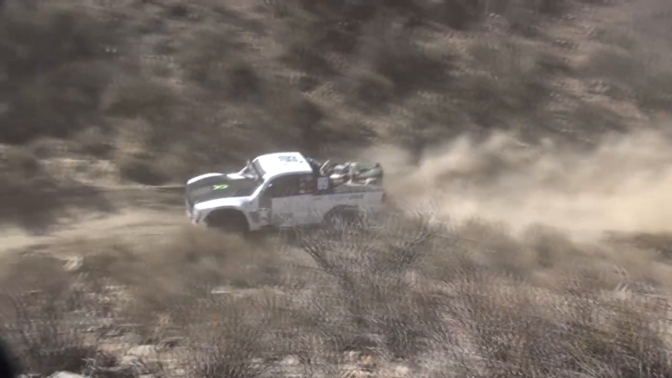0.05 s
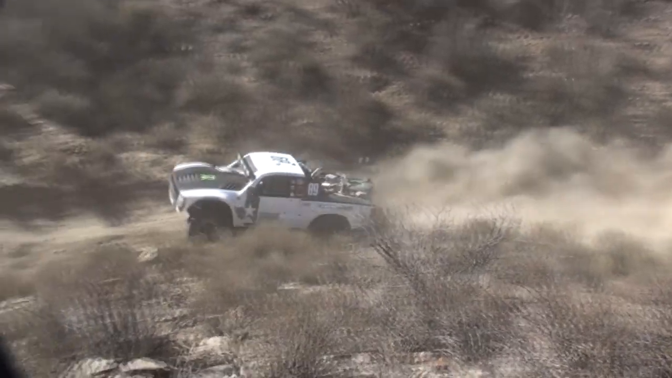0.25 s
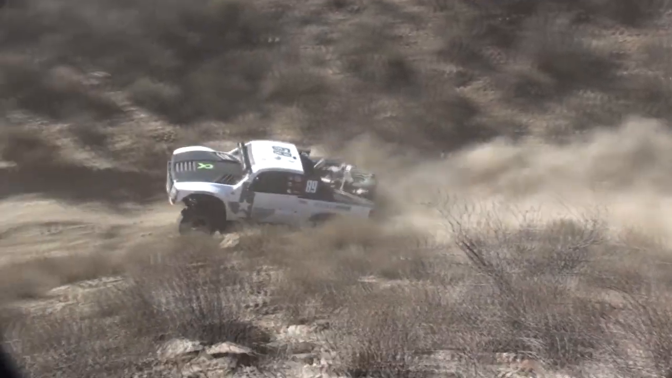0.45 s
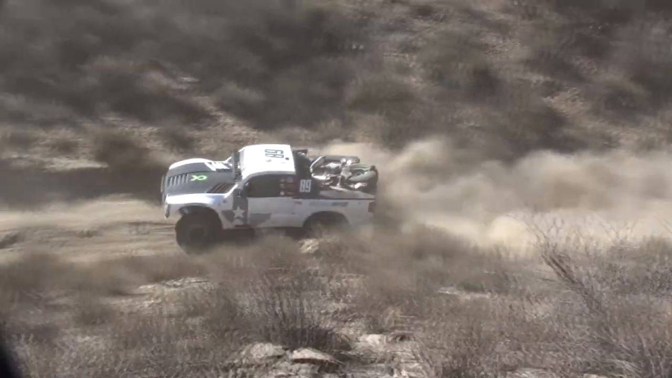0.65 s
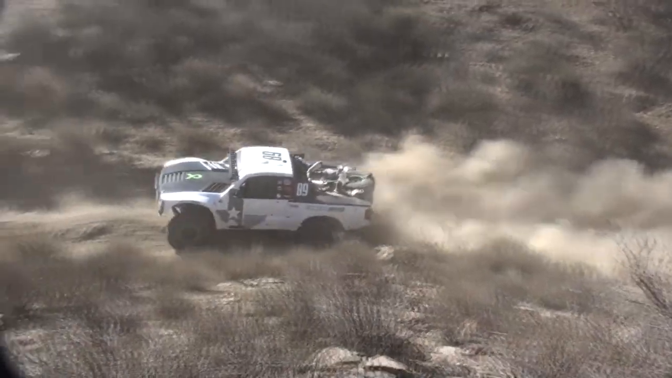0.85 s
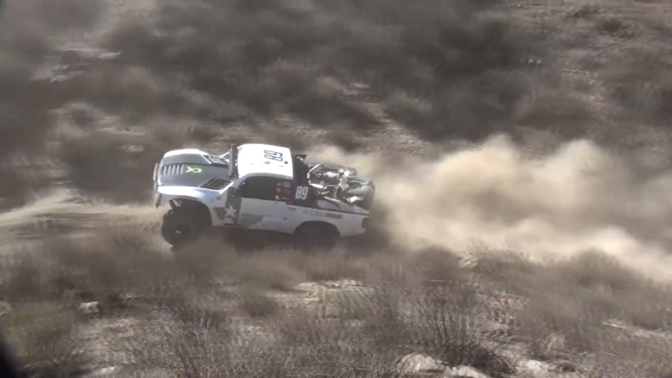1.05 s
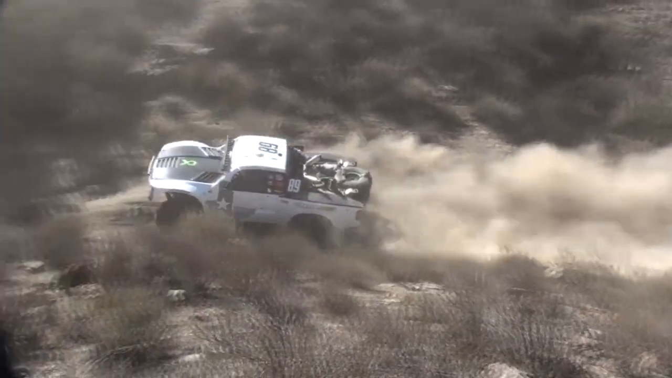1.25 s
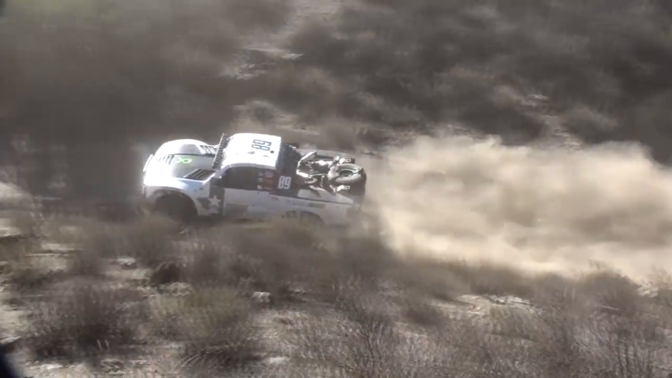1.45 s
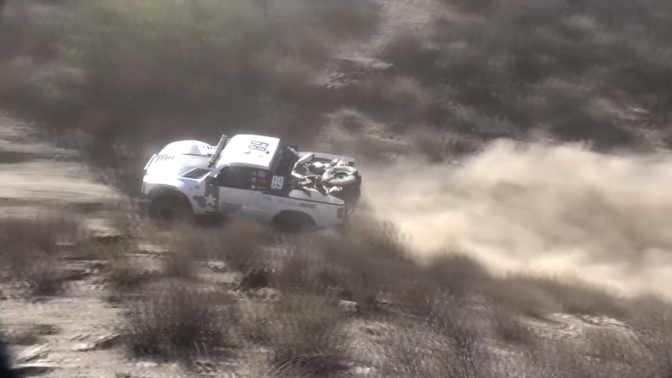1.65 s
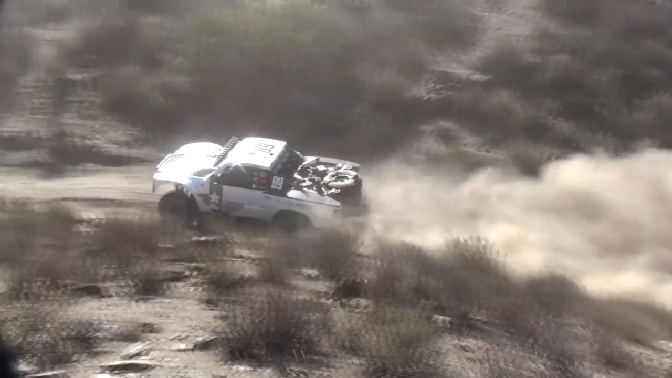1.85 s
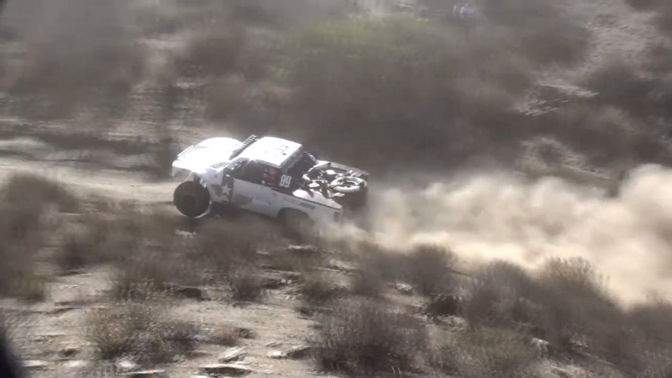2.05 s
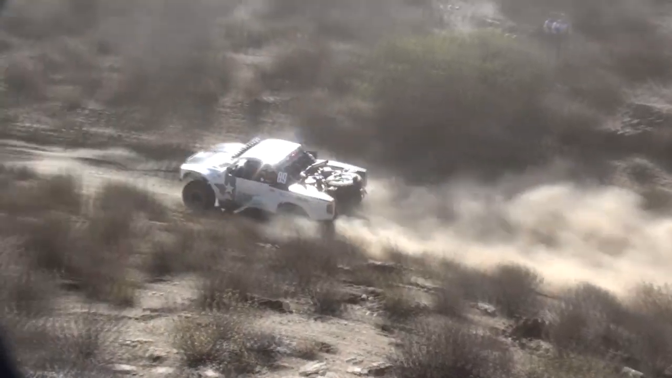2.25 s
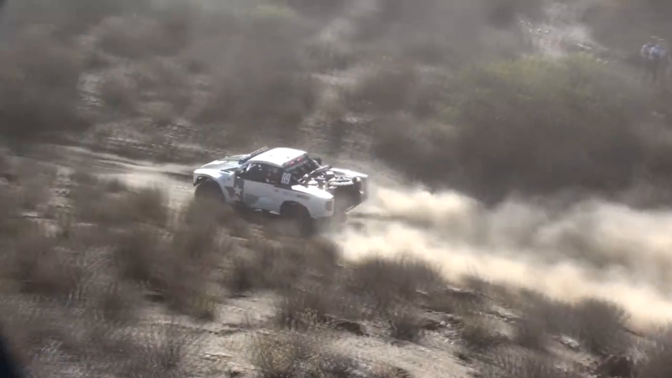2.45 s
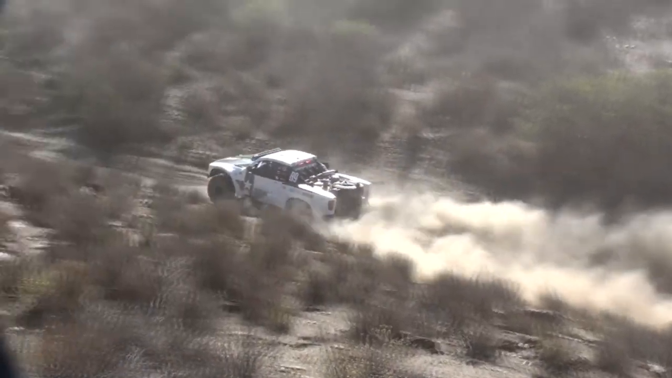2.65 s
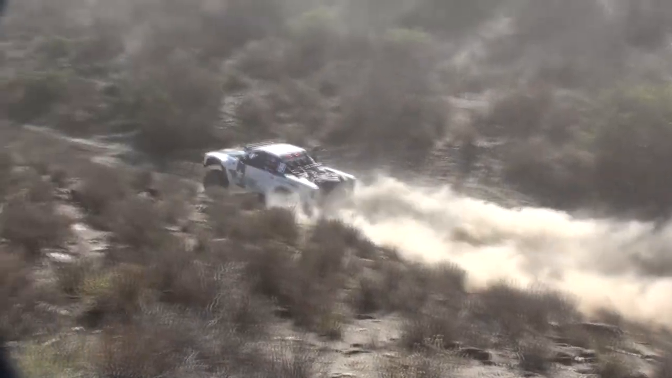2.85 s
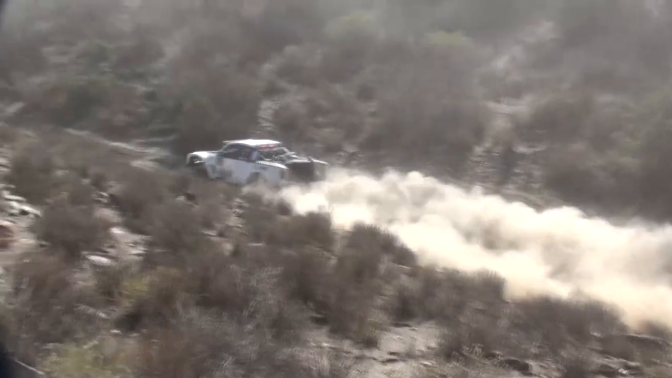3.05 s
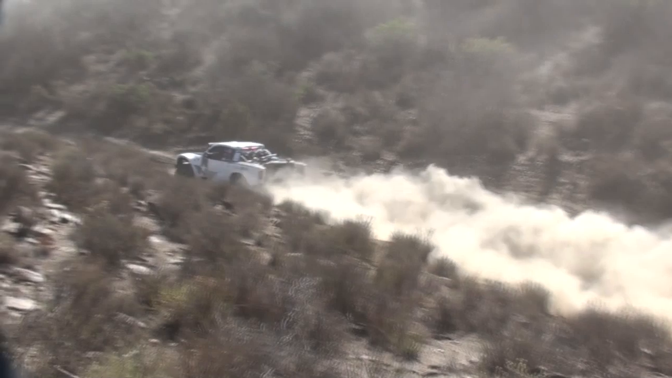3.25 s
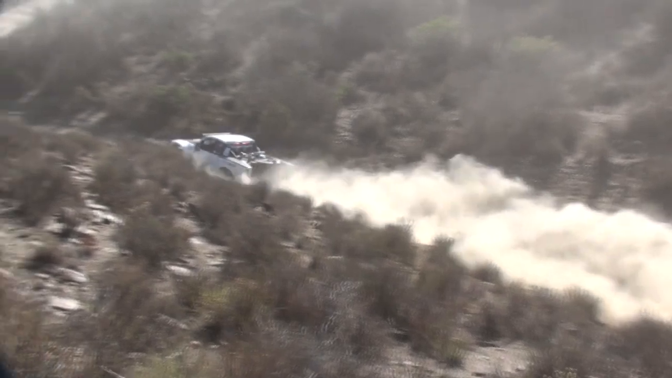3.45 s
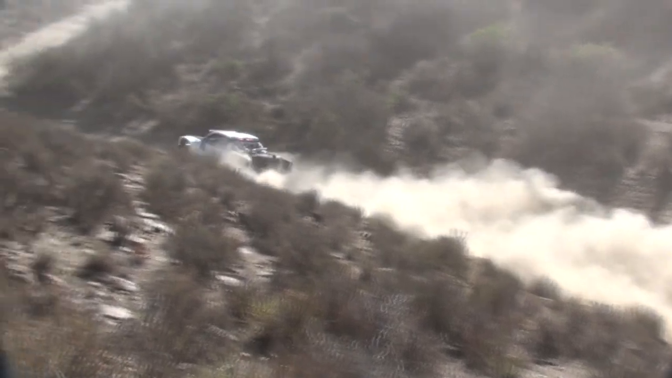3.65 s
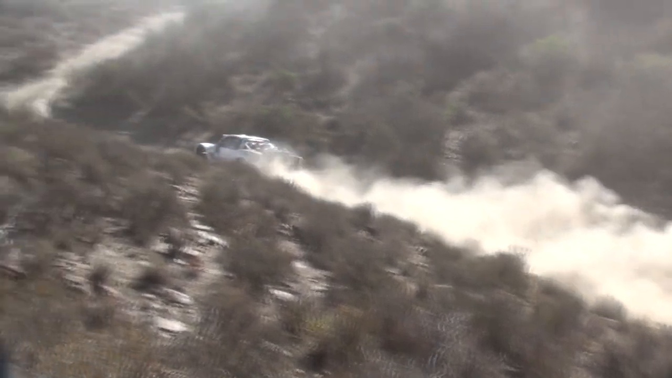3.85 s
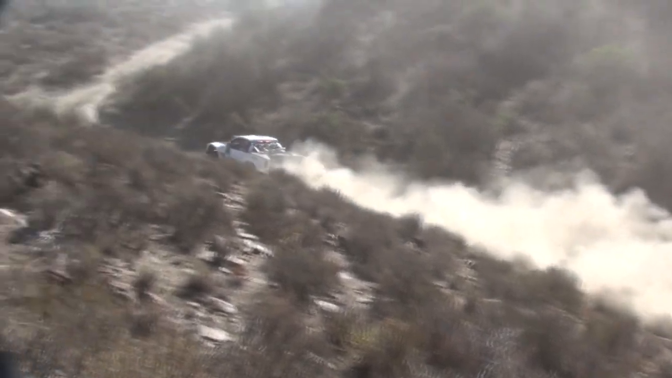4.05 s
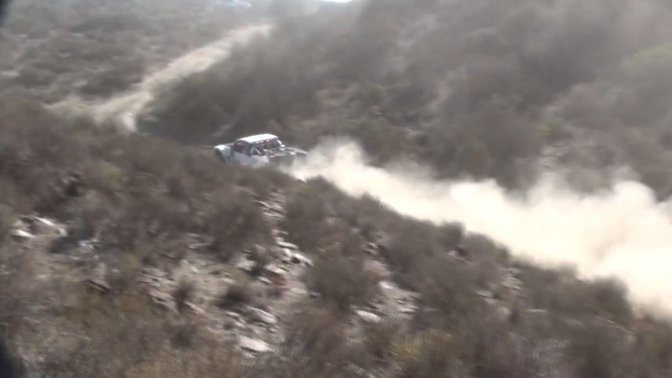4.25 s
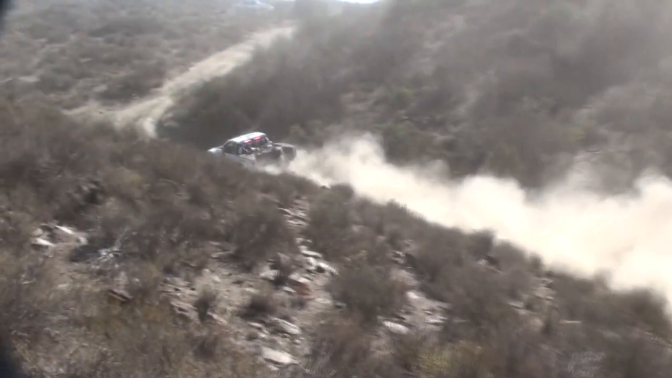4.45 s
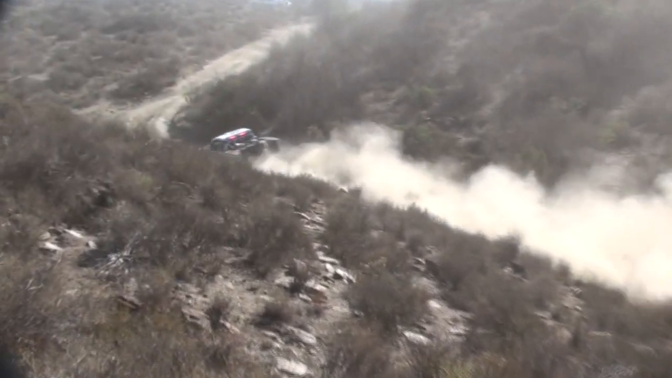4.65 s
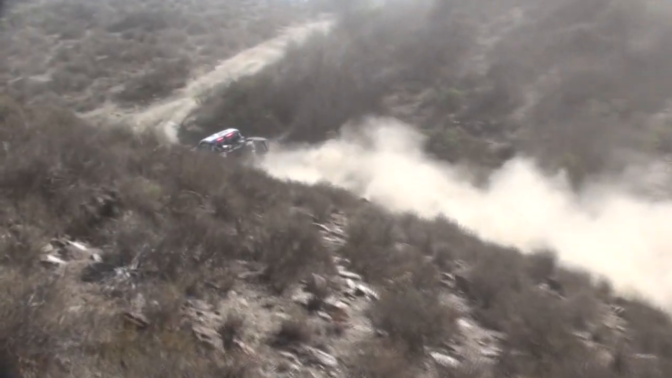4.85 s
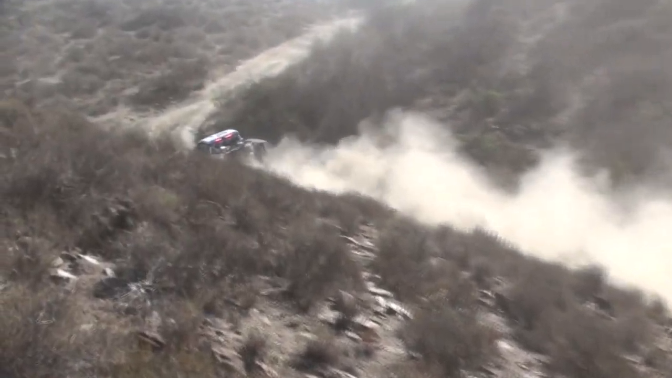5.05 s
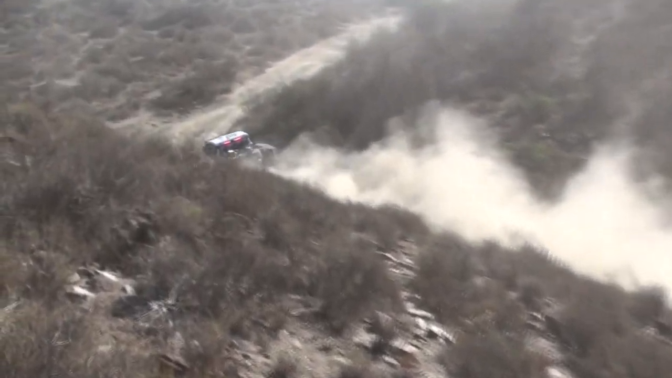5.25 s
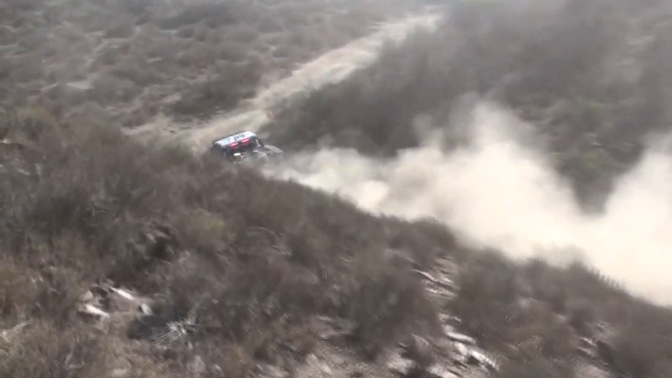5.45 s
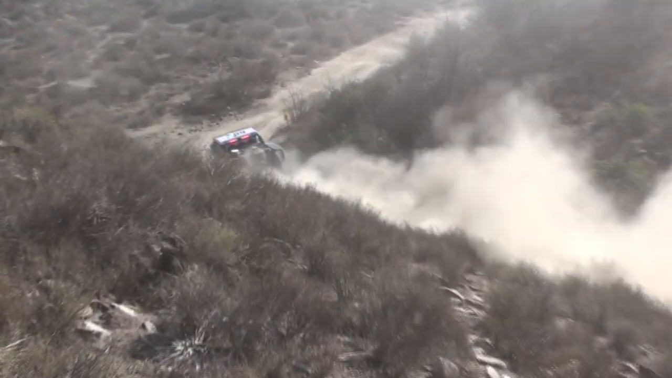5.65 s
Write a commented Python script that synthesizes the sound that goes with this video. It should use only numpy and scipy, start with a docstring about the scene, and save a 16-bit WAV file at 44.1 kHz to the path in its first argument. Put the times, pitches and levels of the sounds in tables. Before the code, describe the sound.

Raw eight-cylinder exhaust climbs to a hard bellow with sharp pops, then drops to a distant low burble with thin squeals and rattles.

```python
"""A desert racing truck with an open eight-cylinder exhaust climbs a dusty hillside, turns away
and lifts off behind the ridge. Sines at multiples of crank speed make its drone; firing pulses and gas
noise, filtered by body and pipes, make its roar and pops. Damped noise bursts are the chassis rattles,
narrow noise and thin tones the brakes, and low gusting noise the wind at two microphone ports."""
import sys
import numpy as np
from scipy import signal
from scipy.fft import rfft, irfft, next_fast_len
from scipy.io import wavfile
from scipy.ndimage import uniform_filter1d, map_coordinates

SR = 44100
rng = np.random.default_rng(int(sys.argv[2]) if len(sys.argv) > 2 else 0)


def transcribe(signal):
    """Save signal, clipped to [-1, 1], as a 16-bit WAV file at the path in sys.argv[1]."""
    frames = np.atleast_2d(signal).T
    limited = np.clip(frames, -1, 1)
    pcm = np.round(limited * 32767).astype(np.int16)
    wavfile.write(sys.argv[1], SR, pcm)


N = 251811

# crank speed and its strong orders: (time [s], speed [turns/s], 3rd, 4th (firing), 5th, 7th order level [dB])
ENGINE = [(0.0, 42.4, -29, -37, -20, -35), (0.11, 41.3, -26.5, -14, -27, -36),
          (0.27, 43.9, -15, -26.5, -35, -41), (0.35, 37.4, -31, -21, -32, -39),
          (0.43, 37.7, -27, -18.5, -33, -46), (0.51, 39.5, -29.5, -26.5, -22, -44),
          (0.7, 41, -23, -17, -28, -33), (0.79, 43.6, -16.5, -25, -29, -35),
          (0.9, 46.8, -16.5, -14.5, -28, -24), (1.06, 51.7, -30.5, -12, -24.5, -32),
          (1.45, 54.9, -39, -11, -33, -28.5), (1.57, 55.4, -40, -11, -25, -30),
          (1.7, 58.7, -34, -10.5, -37, -40), (1.76, 60, -48, -11, -46, -46),
          (2.04, 61.8, -47, -11.5, -30, -36), (2.11, 58.5, -26, -12, -38, -30.5),
          (2.3, 61.7, -29.5, -12, -36, -39), (2.43, 53.7, -19.5, -15, -45, -27.5),
          (2.67, 58.2, -18.5, -20.5, -41, -28.5), (2.7, 57.7, -18, -23, -54, -31),
          (2.83, 60.6, -25.5, -16, -37, -31), (3.04, 61.2, -23, -19, -39, -33),
          (3.1, 60.3, -23, -20, -34.5, -38), (3.15, 57.9, -25, -23, -60, -56),
          (3.2, 56.5, -24, -34, -43, -51), (3.26, 56.5, -26, -26.5, -59, -39),
          (3.45, 55.3, -23, -20.5, -46, -28.5), (3.66, 56.7, -20.5, -35, -46, -31.5),
          (3.77, 58.3, -22, -32, -45, -30), (3.82, 57.5, -23.5, -40, -53, -31),
          (3.9, 53.7, -29, -27, -49, -43), (3.97, 50.8, -30.5, -43, -42, -57),
          (4.09, 42.9, -22.5, -38, -48, -42), (4.18, 39.8, -26.5, -44, -47, -54),
          (4.29, 41.3, -24.5, -31, -50, -59), (4.39, 42.9, -23.5, -31.5, -49, -64),
          (4.64, 38.5, -29.5, -36, -41, -65), (4.72, 31.8, -55, -33, -53, -60),
          (4.8, 29.4, -44, -26, -35.5, -52), (4.98, 26.9, -55, -28.5, -31.5, -41),
          (5.22, 31.3, -41, -23.5, -31.5, -40.5), (5.45, 28.4, -47, -27, -33.5, -37),
          (5.61, 34.3, -38, -17, -31.5, -47), (5.71, 38.3, -28, -41, -35, -46)]
# spectrum of escaping gas: (frequency [Hz], relative density [dB per Hz])
CRACKLE = [(1180, -11), (2000, 0), (2220, -1), (2820, -2.5), (3140, -2.5), (3750, -6), (4020, -11.5),
           (4700, -9), (6000, -16), (7800, -18.5), (13200, -120)]
# ringing of the pipe ends: (frequency [Hz], width [Hz], relative level [dB])
TIP = [(3170, 560, 0), (3650, 400, -2.5)]
# tailpipe resonances, one list for each view of the truck: (frequency [Hz], width [Hz], relative level [dB])
PIPES = [
    [(635, 100, -2), (983, 92, 1.5), (1270, 39, -4), (1570, 58, -1.5), (1750, 77, -6)],
    [(570, 35.4, -30), (964, 92, 1), (1238, 56, 2.5), (1536, 37, 2), (1882, 86, -2.5)],
    [(740, 110, 0.5), (1010, 56.2, 3.5), (1413.4, 132, -6), (1750, 140, -8.5), (1994, 92, -5.5)],
    [(590, 58.3, -31), (883.2, 64, 4.5), (1227, 106, -2.5), (1401.5, 246, -21), (1697, 51, 1.5)],
    [(574, 84, -18), (893.2, 65.5, -2.5), (1064, 88.6, -1.5), (1394.6, 53, 0), (1770, 170, -7)],
    [(620, 93, -26), (913, 75, 6), (1052, 75, -7), (1290, 96, -3), (1780, 300, -24)],
]


def amp(db):
    """Amplitude ratio: twenty decibels for each factor of ten."""
    return 10 ** (np.asarray(db) / 20)


def unit(x):
    """Normalization to a root-mean-square of 1."""
    return x / np.sqrt(np.mean(x ** 2) + 1e-20)


def levelled(x):
    """Running normalization: rms held at 1 over fifths of a second."""
    return x / np.sqrt(np.abs(uniform_filter1d(x ** 2, SR // 5)) + 1e-20)


def along(points, hz):
    """Interpolation of (frequency [Hz], value) points on a logarithmic frequency axis."""
    f, v = np.transpose(points)
    return np.interp(np.log(hz + 1), np.log(f + 1), v)


def curves(rows):
    """Linear interpolation in time: one value per sample for each column after the time."""
    times, *columns = np.transpose(rows)
    return [np.interp(np.arange(N) / SR, times, column) for column in columns]


def wobble(rate):
    """Slow random modulation: a smooth curve through rate random knots a second."""
    knots = rng.standard_normal(int(N * rate / SR) + 4)
    return map_coordinates(knots, [np.arange(N) * rate / SR])


def filtered(x, response):
    """Linear filtering: the spectrum of x times a complex response; mirrored ends keep the edges quiet."""
    m, margin = next_fast_len(N + SR // 4), SR // 8
    wide = np.pad(x, [(0, 0)] * (x.ndim - 1) + [(margin, m - N - margin)], "reflect")
    return irfft(rfft(wide) * response(np.fft.rfftfreq(m, 1 / SR)), m)[..., margin:margin + N]


def coloured(x, spectrum):
    """Spectral shaping: x weighted by a (frequency [Hz], level [dB]) curve."""
    return filtered(x, lambda hz: amp(along(spectrum, hz)))


def resonant(x, modes):
    """Modal resonance: parallel second-order band-passes (frequency, width, level), alternating in sign."""
    def response(f):
        return sum((-1) ** k * amp(db) * 1j * f * width / (centre ** 2 - f * f + 1j * f * width)
                   for k, (centre, width, db) in enumerate(modes))
    return filtered(x, response)


def drone(turns, growl_db):
    """Periodicity of the crank: strong orders, two that follow the growl, and weak ones from uneven cylinders."""
    # multiples of crank speed, as in the engine table
    strong_orders = (3, 4, 5, 7)
    # orders that come and go with the growl: (multiple of crank speed, level over the growl [dB])
    uneven_orders = [(6, -15.5), (8, -12)]
    # weak orders, skipping those above: (multiple of crank speed, relative level [dB])
    weak_orders = [(0.5, -60), (1, -62), (1.5, -14), (2, -15.5), (2.5, -15.5), (3, -1), (3.5, -13.5),
                   (4, 0), (4.5, -20.5), (5, -12.5), (5.5, -19.5), (6, -14.5), (6.5, -13.5), (7, -12),
                   (7.5, -31), (8, -14.5), (8.5, -22), (9, -18), (9.5, -24.5), (10, -8.5), (10.5, -17.5),
                   (11, -35), (11.5, -17), (12, -14)]
    # level of the weak orders below the firing order: (time [s], level [dB])
    low_level = [(0, -30), (.9, -33), (1.4, -38.5), (1.8, -28.5), (2.25, -28), (2.45, -35), (2.8, -28.5),
                 (3.8, -31), (4.3, -37.5), (5, -44), (5.71, -40)]
    # body response with a dip in the growl: (frequency [Hz], relative level [dB])
    body = [(200, 14.5), (350, -.3), (450, -8.5), (580, 4.8), (760, -5.5)]
    speed, *strong_db = curves(ENGINE)
    # strong orders flutter when the crank is slow: fully below 42 turns/s, barely above 51
    slowness = np.clip((51 - speed) / (51 - 42), 0, 1)
    flutter_db = 0.21 + 2 * slowness
    taken = tuple(strong_orders) + tuple(k for k, _ in uneven_orders)
    firing_order = strong_orders[1]

    def tone(k):
        return np.sqrt(2) * np.sin(2 * np.pi * (k * turns + rng.random()))

    def weak(pick):
        return unit(sum(amp(db + 3.3 * wobble(13)) * tone(k)
                        for k, db in weak_orders if pick(k) and k not in taken))

    strong = sum(amp(db + flutter_db * wobble(18)) * tone(k) for k, db in zip(strong_orders, strong_db))
    uneven = sum(amp(growl_db + db + 4.8 * wobble(12)) * tone(k) for k, db in uneven_orders)
    low = amp(curves(low_level)[0] + 1.1 * wobble(5.9)) * weak(lambda k: k < firing_order)
    high = amp(growl_db - 6.5) * coloured(weak(lambda k: k > firing_order), body)
    return strong + uneven + low + high


def blasts(turns, scatter_db, t60, pulse_share, bank=0):
    """Pulsed gas discharge: four firings a turn, each a sharp pulse and a decaying puff of turbulence."""
    # strength of each cylinder in firing order: (level [dB])
    cylinder_db = [8.5, -9.5, 1.8, 1.5, -3.5, 5, -2, 3.5]
    # extra travel time through each cylinder's header pipe: (delay [ms])
    header_ms = [0, .55, .15, .9, .3, .7, .05, 1.1]
    fired = np.floor(4 * turns).astype(int)
    at = np.flatnonzero(np.diff(fired, prepend=0))
    cylinder = fired[at] % 8
    chance = rng.standard_normal((len(at), 2))
    size = amp(np.roll(cylinder_db, bank)[cylinder] + scatter_db * chance[:, 0])
    # every header shares 0.5 ms of travel; each firing strays a little in time
    late = (np.array(header_ms)[cylinder] + .5 + .05 * chance[:, 1]) * SR / 1000
    pulses = np.bincount(at + np.abs(late).astype(int), size, N + SR)[:N]
    puffs = signal.lfilter([1], [1, -amp(-60 / (t60 * SR))], pulses)
    turbulence = (puffs + 2.6 * puffs.mean()) * rng.standard_normal(N)
    share = np.clip(pulse_share, 0, 1)
    return share * unit(pulses) + (1 - share) * unit(turbulence)


def tailpipes(turns):
    """Pipe resonance: two banks share one cylinder pattern, shifted by four firings, and ring alternate modes."""
    # as the truck turns, views crossfade between full spans: (start [s], end [s])
    views = [(0, 0.71), (1.65, 2.5), (2.45, 3.17), (3.35, 3.77), (4.1, 5.7), (5.5, 5.5)]
    left, right = (blasts(turns, scatter_db=1.5, t60=.05, pulse_share=.72, bank=b) for b in (0, 4))
    rasp = np.zeros(N)
    for k, modes in enumerate(PIPES):
        heard = np.repeat(np.arange(len(views)) == k, 2)
        facing = np.interp(np.arange(N) / SR, np.ravel(views), heard)
        rasp += facing * unit(resonant(left, modes[::2]) + resonant(right, modes[1::2]))
    # band limits near 500 and 2100 Hz
    return filtered(rasp, lambda hz: 1 / (1 + (hz / 2100) ** 8) / (1 + (500 / (hz + 1)) ** 8))


def truck():
    """Source and filter: the drone, and firing blasts shaped into growl, rasp, crackle and hiss."""
    # exhaust bark and hiss of widely scattered firings: (time [s], growl [dB], rasp [dB], crackle [dB], hiss
    # [dB])
    roar = [(0.0, -17.5, -22, -32.5, -32), (0.09, -25, -25, -34.5, -40.5), (0.22, -19.5, -24, -33.5, -37.5),
            (0.37, -27.5, -28.5, -32.5, -40), (0.67, -17.5, -24, -32, -33), (1.08, -22, -25, -33, -38.5),
            (1.59, -26, -25, -30.5, -41), (1.78, -28.5, -23.5, -29.5, -37.5),
            (2.07, -25, -19.5, -27.5, -39), (2.3, -23, -23, -31, -41), (2.38, -27.5, -28, -35, -43.5),
            (2.58, -24, -22.5, -31, -40.5), (2.69, -30, -25, -31.5, -41), (2.8, -21.5, -23, -32, -41),
            (2.94, -26.5, -22.5, -31.5, -40.5), (3.04, -23, -20.5, -33, -41), (3.16, -30.5, -29, -39, -44),
            (3.61, -28, -24, -35.5, -44), (3.72, -28, -20.5, -36, -44), (3.99, -33.5, -38, -46, -52),
            (4.21, -35.5, -49.5, -50.5, -55), (4.23, -32, -43.5, -52.5, -57),
            (4.55, -35.5, -44.5, -47.5, -52), (4.74, -39.5, -48.5, -50.5, -53),
            (5.04, -43, -55.5, -57.5, -58), (5.42, -42, -63, -61, -59.5), (5.6, -35.5, -43.5, -57.5, -61),
            (5.71, -40, -50, -57, -56)]
    # growl spectrum: (frequency [Hz], relative density [dB per Hz])
    growl_spectrum = [(50, -43), (80, -24), (130, -4), (220, 3.5), (300, -8), (400, -4), (460, -5.5),
                      (580, -3.5), (720, -9.5), (900, -10), (1300, -13.5), (2000, -120)]
    # hiss spectrum: (frequency [Hz], relative density [dB per Hz])
    hiss_spectrum = [(2940, -1.5), (5000, -6.5), (6240, -6), (7720, 1), (8920, -8), (10600, -6),
                     (13500, -21), (14700, -38)]
    # ringing of the pipe ends, strongest as the truck passes broadside: (time [s], share [0-1])
    tip_share = [(0, 0.15), (.9, 0), (1.5, 0.53), (2.3, 0.14), (2.5, 0.06), (3.4, 0.25), (4, 0.2),
                 (5.71, 0.1)]
    # brief swells and a slight dip of the crackle: (time [s], change of level [dB])
    swells = [(.02, 3.5), (.76, 3.5), (.87, -1), (2.22, 7), (2.54, 5.5), (3.7, 6), (4.26, 7)]
    swell_s = 0.039
    t, turns = np.arange(N) / SR, np.cumsum(curves(ENGINE)[0]) / SR
    growl_db, rasp_db, crackle_db, hiss_db = curves(roar)
    swells_db = sum(db * np.exp(-((t - s) / swell_s) ** 2) for s, db in swells)
    growl = coloured(blasts(turns, scatter_db=1.0, t60=0.047, pulse_share=0.19), growl_spectrum)
    rasp = tailpipes(turns)
    gas = blasts(turns, scatter_db=2.5, t60=.025, pulse_share=.33, bank=2)
    ringing = unit(resonant(resonant(gas, TIP), TIP))
    crackle = unit(coloured(gas, CRACKLE)) + np.abs(curves(tip_share)[0]) * ringing
    hiss = coloured(blasts(turns, scatter_db=7.5, t60=0.058, pulse_share=0.11), hiss_spectrum)
    jolts = wobble(14)  # ruts shake the pipe and the tyres together
    return (drone(turns, growl_db)
            + amp(growl_db + wobble(11)) * levelled(growl)
            + amp(rasp_db + 1.2 * jolts) * levelled(rasp)
            + amp(crackle_db + swells_db + .5 * jolts) * levelled(crackle)
            + amp(hiss_db + 1.36 * jolts) * levelled(hiss))


def pops():
    """Impulsive gas release: a short crack at the pipe ends and a longer bark down the pipes."""
    # single hard pops: (time [s], nominal crack peak [dB], nominal bark level [dB])
    pop_events = [(0.033, -19, -17), (0.7364, -21, -19), (0.798, -24, -15), (0.8624, -20, -14.5),
                  (0.9044, -24, -17), (0.95, -19, -19), (1.1019, -13, -24), (1.1208, -20, -16),
                  (1.2351, -20, -16.5), (1.3289, -14, -29), (1.704, -13, -24), (1.7693, -12, -21),
                  (1.805, -17, -22), (1.8716, -14, -20), (1.9046, -12, -21), (2.1, -13.5, -21),
                  (2.1545, -15, -24), (2.2, -8, -21), (2.2657, -12, -16), (2.5341, -9, -18),
                  (2.5686, -16, -21), (2.6394, -13, -24), (2.7427, -13, -23), (3.6476, -17.5, -26)]
    crack_t60, bark_t60 = 0.021, 0.046  # s
    peak_over_rms_db = 6
    crack, bark, t = np.zeros(N), np.zeros(N), np.arange(SR // 10) / SR
    for s, crack_db, bark_db in pop_events:
        start = round(s * SR)
        crack[start:][:len(t)] += amp(crack_db - peak_over_rms_db - 60 * t / crack_t60)
        bark[start:][:len(t)] += amp(bark_db - 60 * t / bark_t60)
    gas = rng.standard_normal((2, N))
    ends = unit(unit(coloured(gas[0], CRACKLE)) + 0.66 * unit(resonant(gas[0], TIP)))
    pipes = unit(resonant(gas[1], PIPES[0]))
    return uniform_filter1d(crack, size=40) * ends + uniform_filter1d(bark, size=40) * pipes


def rattles():
    """Damped impact noise: loose metal chatters briefly at each rut."""
    # chassis rattles: (time [s], level [dB], lower part over that level [dB])
    rattle_hits = [(0.0294, -25.5, 3), (0.1133, -28, 3), (0.1744, -30, 5), (0.2094, -30, 9),
                   (0.2486, -22, 4), (0.27, -42.5, 21), (0.3044, -36.5, 10), (0.3441, -31, 0),
                   (0.7394, -27, -6), (0.8594, -28.5, 3), (0.9295, -43, -9), (4.0312, -42.5, 1),
                   (4.2539, -41.5, 7), (4.3735, -46, 10.5), (4.507, -47, 8), (4.553, -43, -5),
                   (4.6558, -42.5, 8), (4.7407, -48, -13), (4.79, -44, -1), (4.845, -45, 7.5),
                   (4.9349, -50, 7), (5.052, -40.5, 3), (5.1657, -50, -14), (5.2175, -50, -3),
                   (5.2895, -48, 4), (5.4163, -55, -1), (5.5175, -49, -11), (5.6269, -49, -2),
                   (5.6671, -54, -3)]
    # bright resonances colouring the rattles, passed twice: (frequency [Hz], width [Hz], level per pass [dB])
    bright_modes = [(4670, 2500, 0), (8000, 960, 3), (10370, 2000, 0), (12600, 1300, -13)]
    rise_s, decay_t60 = 0.0077, 0.11
    high, low, t = np.zeros(N + SR), np.zeros(N + SR), np.arange(SR // 6) / SR
    shape = (1 - np.exp(-t / rise_s)) * amp(-60 * t / decay_t60)
    for s, db, low_db in rattle_hits:
        start = round(s * SR)
        high[start:][:len(t)] += amp(db) * shape
        low[start:][:len(t)] += amp(db + low_db) * shape

    def chatter():
        return amp(0.74 * wobble(440)) * rng.standard_normal(N)

    bright = unit(resonant(resonant(chatter(), bright_modes), bright_modes))
    return high[:N] * bright + low[:N] * unit(coloured(chatter(), CRACKLE))


def notes(rows):
    """Amplitude envelope: gain of (start, length, first level, last level) notes with soft ends."""
    soft_s = 0.051
    t = np.arange(N) / SR
    held = sum((t > s) * (t < s + long) * amp(np.interp(t, [s, s + long], [first, last]))
               for s, long, first, last in rows)
    return uniform_filter1d(held, int(soft_s * SR))


def brakes():
    """Stick-slip friction: a squeal so unsteady that it is a narrow noise band, with a faint overtone."""
    # squeals: (start [s], length [s], first level [dB], last level [dB])
    squeal_notes = [(4.37, 0.021, -58, -60), (4.56, 0.094, -42, -46), (4.675, 0.278, -39.5, -44.5),
                    (4.96, 0.18, -61, -57), (5.15, 0.259, -59, -53), (5.45, .24, -70.5, -60)]
    # a thin tone beside the squeal: (start [s], length [s], first level [dB], last level [dB])
    whistle_notes = [(4.25, 0.18, -58, -58), (4.44, .07, -46, -50), (4.55, .31, -62, -57),
                     (4.9, .16, -59, -54)]
    # mean squeal pitch: (time [s], pitch [Hz])
    squeal_pitch = [(4.37, 5837), (4.56, 5950), (4.68, 6070), (5.2, 6040), (5.4, 5880), (5.6, 6075)]
    whistle_hz, chatter_db = 3866, 1.5
    flutter = wobble(130) + 1j * wobble(130) + 0.57 * (wobble(800) + 1j * wobble(800))
    squeal_hz = curves(squeal_pitch)[0] + 35 * wobble(45)
    band = flutter * np.exp(2j * np.pi * np.cumsum(squeal_hz) / SR)
    overtone = unit((band ** 2).real)  # squaring doubles the frequency
    squeal = unit(band.real) + amp(-29) * overtone
    thin = np.sqrt(2) * np.sin(2 * np.pi * np.cumsum(whistle_hz + 9 * wobble(60)) / SR)
    return notes(squeal_notes) * amp(chatter_db * wobble(25)) * squeal + notes(whistle_notes) * thin


def ports(x):
    """Partial coherence: a part scattered by brush and dust keeps changing and differs between two ports."""
    # left-right likeness: (frequency [Hz], coherence [0-1])
    alike = [(60, .93), (130, .995), (300, .93), (600, .96), (1000, .985), (2500, .9), (5000, .85),
             (9000, .74), (14000, .72)]
    # level difference: (frequency [Hz], left minus right [dB])
    tilt = [(60, 14), (91, -11), (140, -6.5), (210, -7), (320, 0), (490, -8.5), (750, -5), (1140, -2.5),
            (1740, -2), (2650, -4), (4040, -3.0), (6150, -4.5), (9370, -1.5), (14300, -1)]
    # phase difference: (frequency [Hz], lead of left [rad])
    lead = [(0, 0.05), (260, 0.78), (1460, 0.45), (1810, 0.53), (2500, 0.67), (3530, 0.27), (4050, -0.88),
            (5080, 0.87), (6460, -0.33), (7060, 0.88), (8270, 0.8), (8870, 1.2), (10200, -0.0),
            (14500, 0.0)]
    z = signal.stft(np.pad(x, (0, 1024), "reflect"), nperseg=512, boundary="even")[2]
    drift = uniform_filter1d(rng.standard_normal((2, *z.shape)), 5, -1)
    shuffled = z * np.exp(1j * np.arctan2(*drift))
    # shuffled phases lose some level, which 1.3 restores
    scattered = signal.istft(shuffled, nperseg=512)[1][:N] * 1.3

    def split(hz):
        angle = np.arccos(np.clip(along(alike, hz), -1, 1)) / 2
        return np.array([np.cos(angle), np.sin(angle)])

    def balance(hz):
        half = amp(along(tilt, hz) / 2) * np.exp(.5j * along(lead, hz))
        return np.array([half, 1 / half])

    mid, side = filtered(np.array([x, scattered]), split)
    return filtered(np.array([mid + side, mid - side]), balance)


def wind():
    """Turbulent pressure fluctuation: low buffeting in gusts, partly different at each port."""
    # mean buffet level: (time [s], level [dB])
    gusts = [(0, -35), (.6, -31), (.9, -35), (1.3, -54), (2.2, -48), (2.6, -60), (3.6, -41), (3.9, -52),
             (4.35, -41), (5.1, -47), (5.71, -45)]
    # buffet spectrum: (frequency [Hz], relative density [dB per Hz])
    rumble = [(9, -60), (18, -14), (30, -14), (45, -12), (70, -6), (100, -1), (200, -120)]
    shared, left, right = rng.standard_normal((3, N))
    pair = coloured(np.array([0.27 * shared + left, 0.27 * shared + right]), rumble)
    port_db = np.array([[-1.2], [1.2]])
    return amp(curves(gusts)[0] + 2.5 * wobble(5) + port_db) * levelled(pair)


def scene():
    """Superposition: truck sounds reach both ports, and wind acts on the ports themselves."""
    return ports(truck() + pops() + rattles() + brakes()) + wind()


def record(dry):
    """Saturation and band limiting: peaks round off at full scale; nothing passes above 15300 Hz."""
    # microphone roll-off: (frequency [Hz], gain [dB])
    edge = [(12500, 0), (13700, 5), (14500, -17), (15000, -35)]
    held = dry / (1 + np.abs(dry) ** 8) ** (1 / 8)
    return filtered(held, lambda hz: amp(along(edge, hz)) * (hz < 15300))


dry = scene()
out = record(dry)
transcribe(out)
```